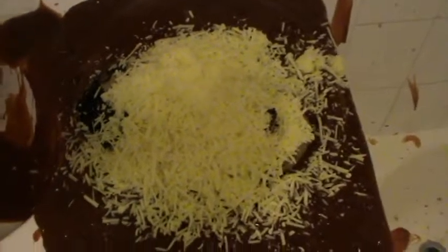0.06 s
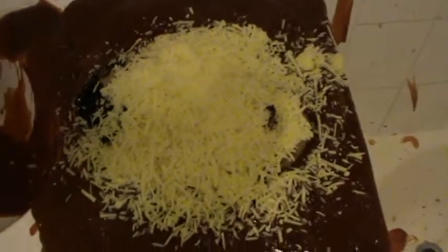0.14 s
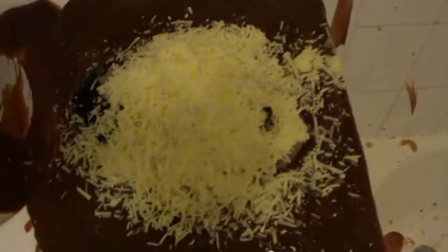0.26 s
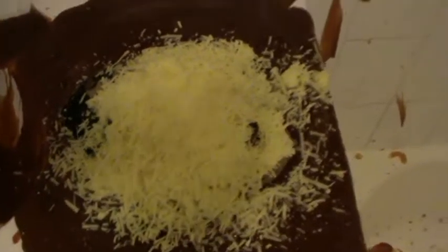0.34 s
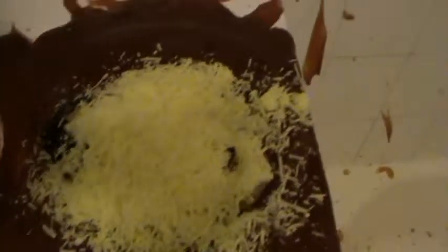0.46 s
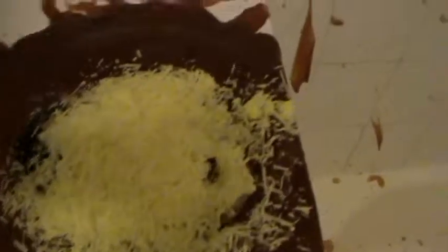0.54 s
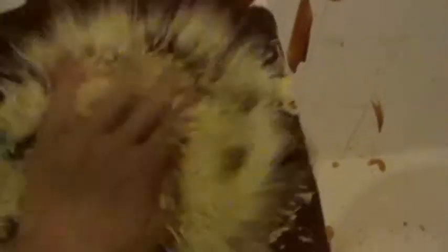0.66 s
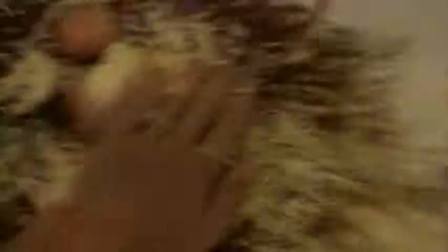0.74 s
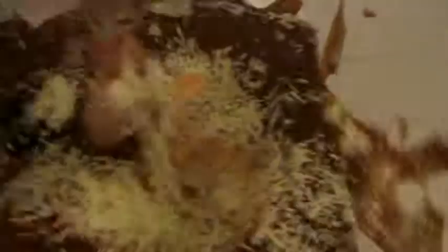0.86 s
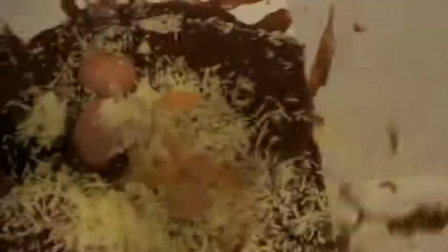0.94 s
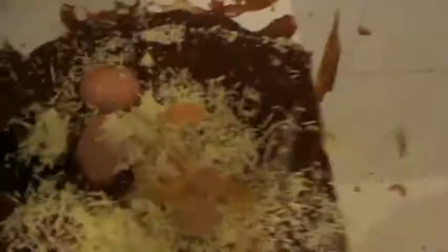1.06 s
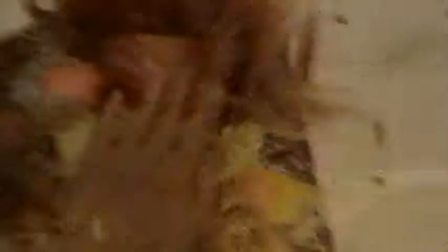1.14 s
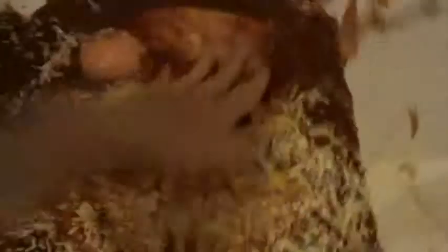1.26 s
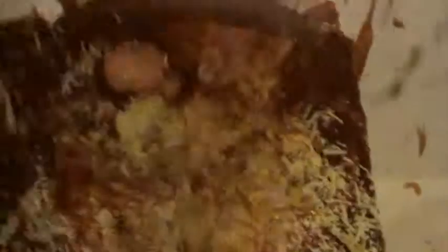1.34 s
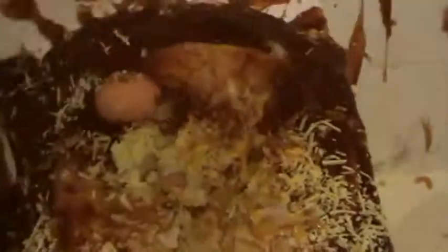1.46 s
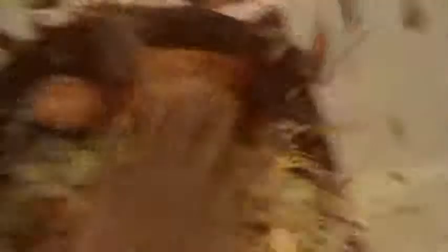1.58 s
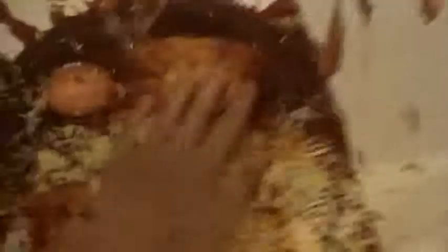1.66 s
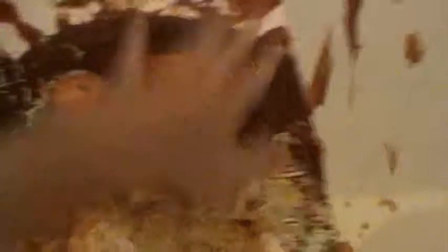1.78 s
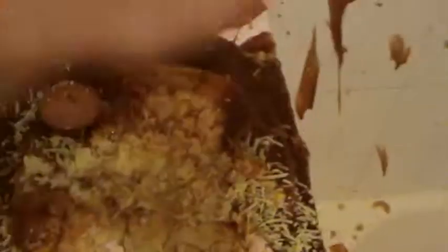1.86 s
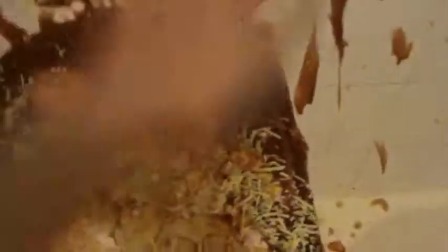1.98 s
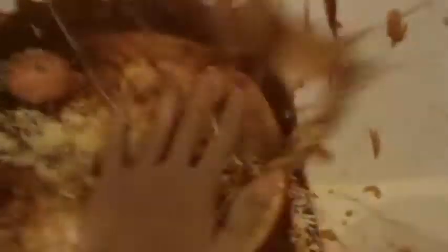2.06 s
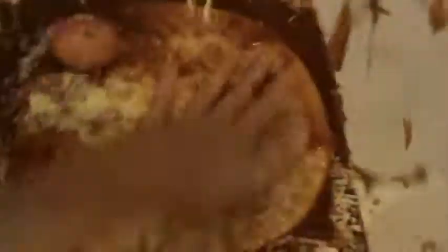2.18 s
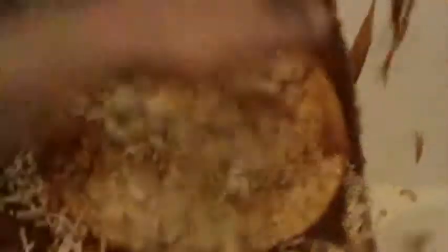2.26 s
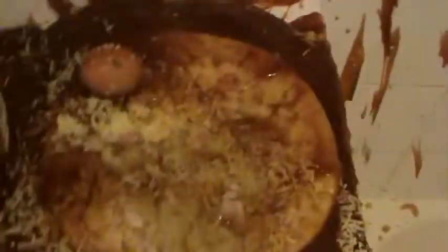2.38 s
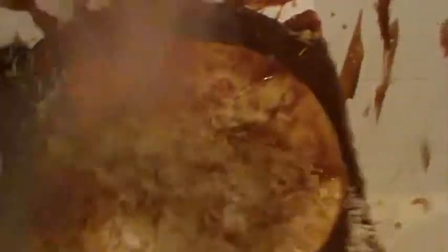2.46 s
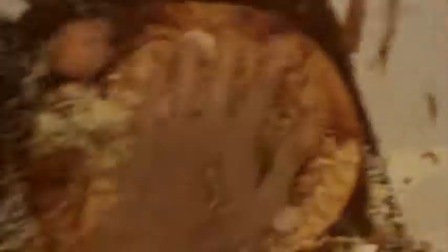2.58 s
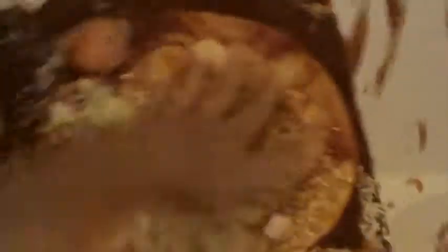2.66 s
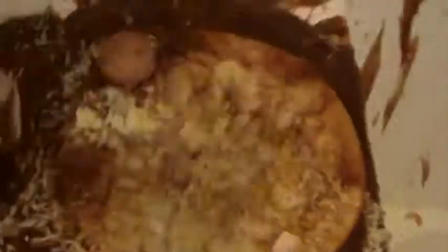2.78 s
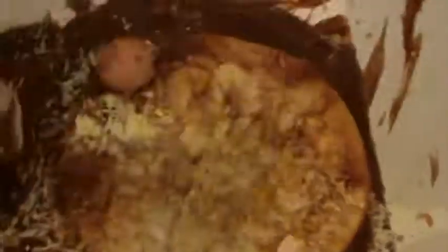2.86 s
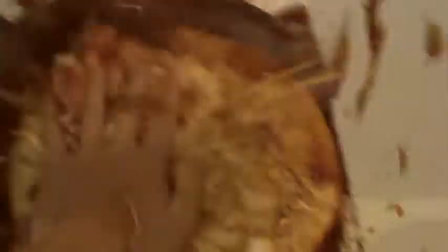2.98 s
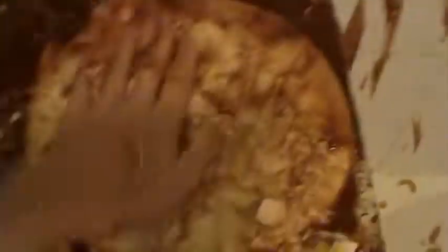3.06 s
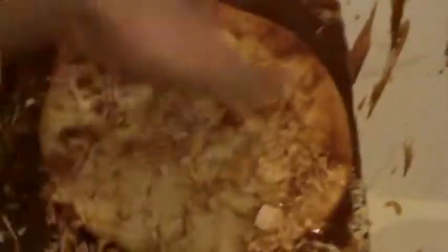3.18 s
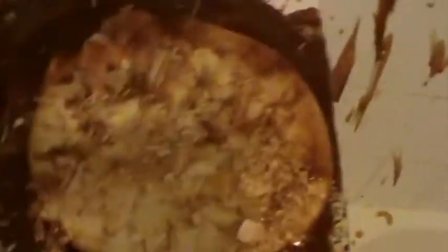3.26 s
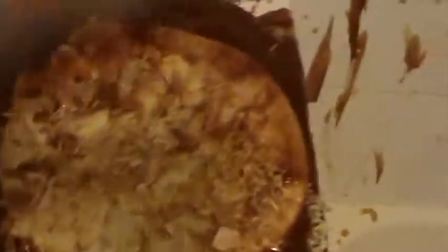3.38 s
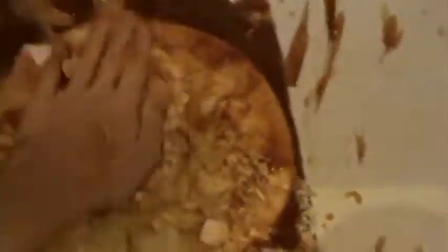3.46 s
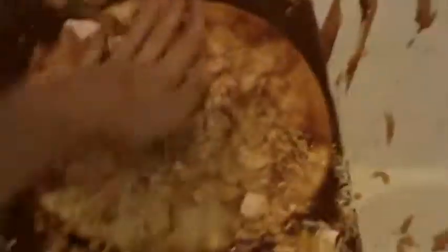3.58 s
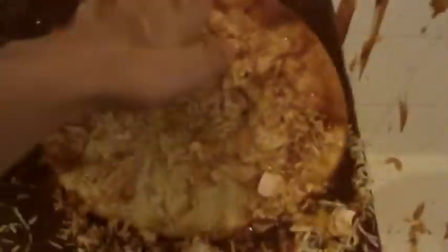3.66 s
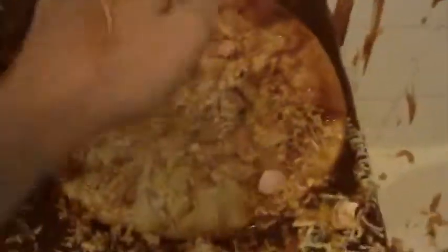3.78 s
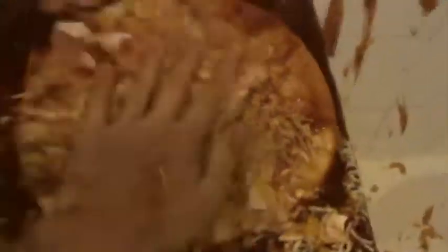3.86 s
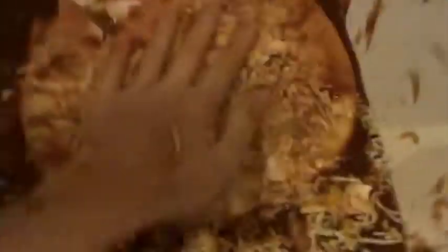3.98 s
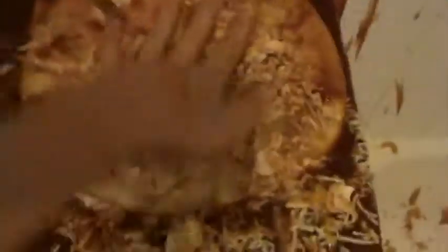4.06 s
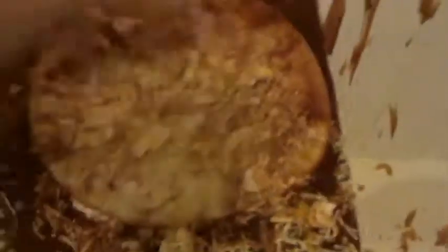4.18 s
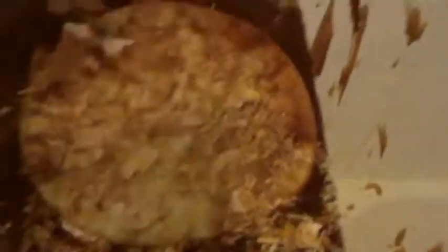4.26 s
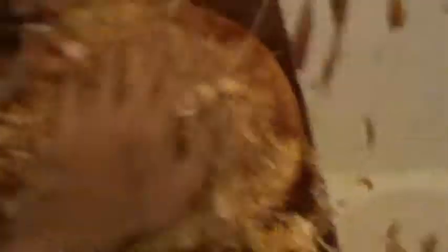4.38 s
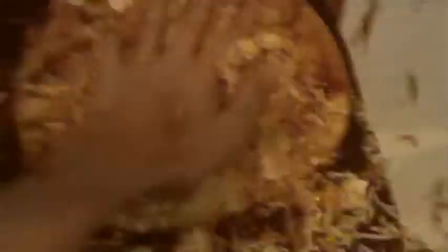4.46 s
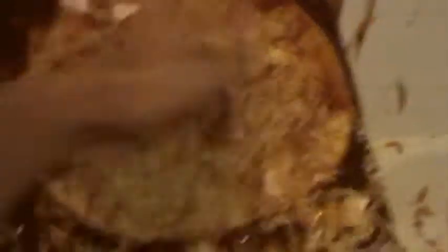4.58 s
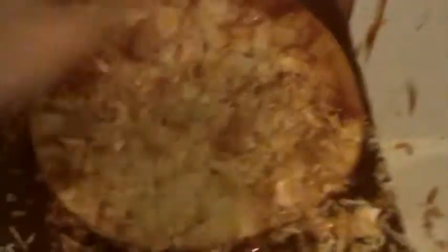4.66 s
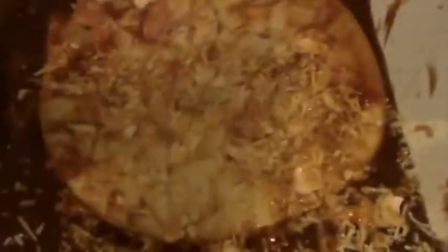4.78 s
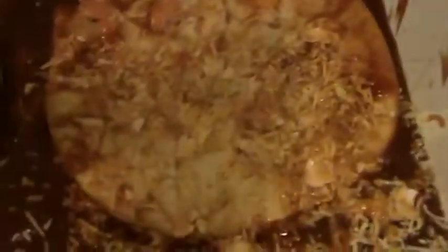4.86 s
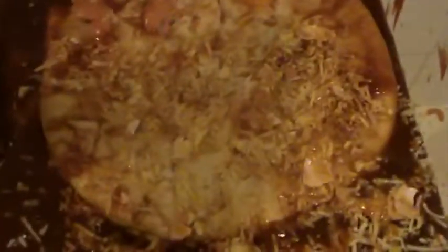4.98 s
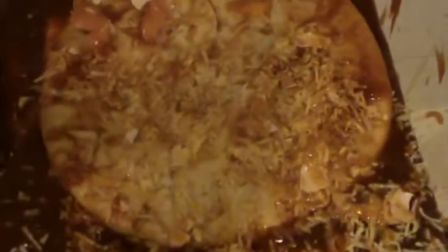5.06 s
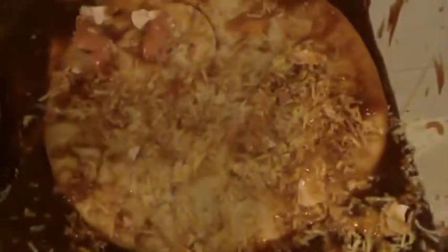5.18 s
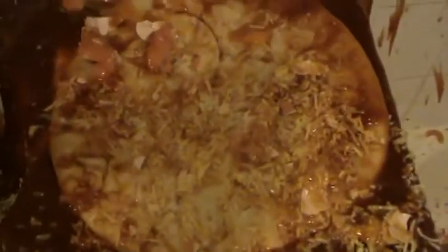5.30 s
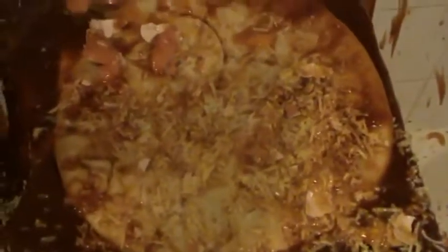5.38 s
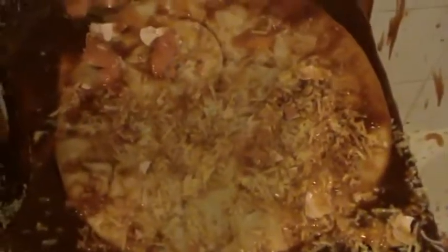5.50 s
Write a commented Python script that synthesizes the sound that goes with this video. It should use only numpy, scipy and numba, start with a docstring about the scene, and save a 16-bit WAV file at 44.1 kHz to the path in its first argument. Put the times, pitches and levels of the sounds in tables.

```python
"""A small tiled bathroom: a flat hand slaps a wet, heaped pizza on a plastic lid nine times.
Each slap cracks, pops and squelches trapped air, knocks the lid and sprays sauce; the palm settles,
may slide, and peels off. Small ticks and plops sound in between. The room booms in its standing
waves, and a gain control flattens the blows."""
import sys
import numpy as np
from scipy import signal
from scipy.fft import rfft, irfft, next_fast_len
from scipy.io import wavfile
from scipy.ndimage import minimum_filter1d
from numba import njit

SR = 44100
rng = np.random.default_rng(int(sys.argv[2]) if len(sys.argv) > 2 else 0)


def digitize_waveform(pressure):
    """Quantize a signal to 16-bit integers and store it at the path in sys.argv[1].

    Rows of a 2-D input are taken as channels; values are limited to [-1, 1].
    """
    field = np.atleast_2d(pressure).T
    bounded = np.clip(field, -1, 1)
    quanta = np.round(bounded * 32767).astype(np.int16)
    wavfile.write(sys.argv[1], SR, quanta)


N = 243873
TIME_S = np.arange(N) / SR
EVENT_S = TIME_S[:SR // 3]
PORT_SIGNS = np.array([[1], [-1]])  # left, right microphone port


def undb(db):
    """Decibels to gain."""
    return 10 ** (np.asarray(db) / 20)


def at(points, hz):
    """Interpolate (Hz, value) points on a log-frequency axis."""
    freqs, values = np.transpose(points)
    return np.interp(np.log(np.maximum(hz, 1)), np.log(freqs), values)


def burst(x, db):
    """Scale x to the energy of 10 ms of sound at db."""
    return x * undb(db) / np.sqrt(np.sum(x ** 2) / (SR / 100))


def add(track, time_s, x):
    """Mix x into the track at time_s."""
    start = max(int(time_s * SR), 0)
    track[start:start + len(x)] += x[:N - start]


def colour(x, points, size=2048):
    """Minimum-phase filter with the given (Hz, dB) spectrum."""
    gain = undb(at(points, np.fft.rfftfreq(size, 1 / SR)))
    cepstrum = irfft(np.log(gain))
    cepstrum[1:size // 2] *= 2
    cepstrum[size // 2 + 1:] = 0
    response = irfft(np.exp(rfft(cepstrum)))
    return signal.fftconvolve(x, response)[:len(x)]


def band(x, hz, octaves, order=1):
    """Band-pass around hz."""
    edges_hz = [hz / 2 ** (octaves / 2), min(hz * 2 ** (octaves / 2), SR / 2 - 1000)]
    return signal.sosfilt(signal.butter(order, edges_hz, "band", fs=SR, output="sos"), x)


def fade(t, t60_s):
    """Exponential decay."""
    return np.exp(-np.log(1000) * t / t60_s)


def ring(hz, t60_s):
    """A struck, damped resonance that pushes no net air."""
    return np.gradient(np.sin(2 * np.pi * hz * EVENT_S) * fade(EVENT_S, t60_s))


def crackle(t, spread_db):
    """Dense tiny clicks of unequal size, as when films of sauce tear."""
    noise = rng.standard_normal(len(t))
    sizes = np.minimum(rng.exponential(size=len(t)), 6)
    return noise * undb(spread_db * sizes)


def bump(hz, t60_s, db):
    """A blow cushioned by dough: only a low note."""
    return burst(band(ring(hz, t60_s), hz, octaves=0.75), db)


def smack(hz, t60_s, db, octaves=1.46):
    """A short tick of band-passed noise."""
    noise = rng.standard_normal(len(EVENT_S)) * fade(EVENT_S, t60_s)
    return burst(band(noise, hz, octaves, order=2), db)


def smear(length_s, hz, octaves, db):
    """Sliding contact: a stream of clicks swells and dies."""
    t = TIME_S[:int(length_s * SR)]
    clicks = crackle(TIME_S[:SR // 2], spread_db=9)[:len(t)]
    swell = np.sin(np.pi * t / length_s)
    return burst(band(clicks * swell, hz, octaves, order=2), db)


# Room noise spectrum: (frequency [Hz], relative density [dB])
FLOOR_SPECTRUM = [(25, 1), (60, -2.5), (140, 7), (300, -3.5), (600, -4), (1500, -11), (4500, -16),
                  (10000, -19), (15500, -24)]


def background(floor_db=-51.5, tick_db=-69.5, tick_period_s=0.08):
    """Low room hum and hiss, with faint regular ticking."""
    mid, left, right = (colour(rng.standard_normal(N), FLOOR_SPECTRUM) for _ in range(3))
    hiss = mid + 1.1 * np.array([left, right])
    ticks = band(rng.standard_normal(N), hz=4800, octaves=0.15, order=2)
    ticks *= fade((TIME_S + 0.023) % tick_period_s, t60_s=0.04)
    return hiss / hiss.std() * undb(floor_db) + ticks / ticks.std() * undb(tick_db)


# Tile echo spectrum: (frequency [Hz], level [dB])
ECHO_SPECTRUM = [(40, -31.5), (120, 4.5), (300, 9), (600, 5.5), (1200, 0.5), (2500, -2), (6000, -5),
                 (15000, -6)]
# Tile echo decay: (frequency [Hz], t60 [s])
ECHO_DECAY = [(100, 0.7), (400, 0.87), (1000, 0.33), (3000, 0.34), (7000, 0.36), (15000, 0.2)]
# Tile echo width: (frequency [Hz], side re mid [dB])
ECHO_WIDTH = [(60, -30), (200, -15), (500, -13), (1500, -4), (4000, -3), (8000, 0), (12000, -6)]


def tile_echo(onset_s=0.002):
    """Two-port response of dense reflections off the tiles, decaying band by band."""
    t = TIME_S[:SR]
    freqs = np.fft.rfftfreq(len(t), 1 / SR)
    mid, side = (rfft(rng.standard_normal(len(t))) for _ in range(2))
    field = mid + PORT_SIGNS * side * undb(at(ECHO_WIDTH, freqs))
    field *= undb(at(ECHO_SPECTRUM, freqs))
    onset = np.minimum(t / onset_s, 1) ** 2
    centres_hz = np.geomspace(120, 16000, 7)
    response = 0
    for hz, weights in zip(centres_hz, np.eye(len(centres_hz))):
        band_noise = irfft(field * at(np.c_[centres_hz, weights], freqs), len(t))
        decay = fade(t, at(ECHO_DECAY, hz)) * onset
        response += band_noise * decay / np.linalg.norm(decay)
    return response


# Room modes: (frequency [Hz], gain [dB], t60 [s])
ROOM_MODES = [(54.14, 15.5, 0.76), (76.8, 13, 0.77), (90.8, 11, 0.45), (133.5, 15.5, 0.46),
              (141.7, 14.5, 1), (185.7, 15.5, 0.55), (192.7, 17, 0.93), (231.7, 14, 1), (236.6, 18.5, 0.43),
              (262, 14.5, 0.97), (302.6, 4.5, 0.8), (304.7, 18, 1), (306, -4, 0.99), (364.5, 15.5, 1),
              (390.6, 22.5, 0.7), (424, 4.5, 0.27), (490, 4.5, 0.85), (498, 10.5, 0.48), (794, 13, 0.54)]


def standing_waves(port_offset_rad=0.18):
    """Response of the room modes; each meets the two ports slightly out of phase."""
    t = TIME_S[:3 * SR // 2]
    response = 0
    for k, (hz, db, t60_s) in enumerate(ROOM_MODES):
        offset_rad = PORT_SIGNS * port_offset_rad * rng.choice([-1, 1])
        wave = (-1) ** k * np.sin(2 * np.pi * hz * t + offset_rad)
        decay = fade(t, t60_s)
        response += undb(db) * wave * 2 * decay / decay.sum()
    return response


def bathroom(directions, direct_db=-4):
    """Direct sound, standing waves, and a separate echo for each direction the sound leaves in."""
    def through(x, response):
        return signal.oaconvolve(x[None], response, axes=1)[:, :N]
    echo = sum(through(x, tile_echo()) for x in directions) / np.sqrt(len(directions))
    boom = through(directions[0], standing_waves())
    return undb(direct_db) * directions[0] + echo + boom


# Port phase: (frequency [Hz], left lead before roll-off [rad])
PORT_LEAD = [(60, 0.8), (260, -0.9), (600, -1.7), (1550, 1.2)]
# Port sensitivity: (frequency [Hz], left minus right [dB])
PORT_TILT = [(60, 3), (120, -1), (380, -1.5), (700, -4), (1300, -1.5), (4400, -1), (8000, -0.5)]


def microphones(x, rolloff_hz=1500):
    """The two ports differ in sensitivity, and long waves meet them out of step."""
    size = next_fast_len(N + SR // 10)
    freqs = np.fft.rfftfreq(size, 1 / SR)
    lead_rad = at(PORT_LEAD, freqs) / (1 + (freqs / rolloff_hz) ** 2)
    gain = undb(PORT_SIGNS * at(PORT_TILT, freqs) / 2)
    response = gain * np.exp(0.5j * PORT_SIGNS * lead_rad)
    return irfft(rfft(x, size) * response, size)[:, :N]


# Small ticks: (time [s], level [dB], centre [Hz])
SMALL_TICKS = [(0.092, -47.5, 6130), (0.628, -54, 2000), (1.111, -28.5, 6130), (1.128, -16.5, 3000),
               (1.142, -26, 4500), (1.164, -13, 6000), (1.429, -8.5, 9000), (2.045, -23.5, 6760),
               (2.530, -21, 3500), (3.140, -8, 2336), (3.44, -30, 5000), (3.747, -20, 1000),
               (4.81, -28, 4100), (5.088, -41, 7940), (5.422, -32, 3780)]


def small_ticks():
    """Drips, a finger touch and faint handling each make a small tick."""
    out = np.zeros(N)
    for time_s, db, hz in SMALL_TICKS:
        add(out, time_s, smack(hz, t60_s=0.019, db=db))
    return out


# Short pitched rings: (time [s], level [dB], pitch [Hz])
SHORT_RINGS = [(0.223, -51, 3269), (0.311, -52.5, 3600), (0.86, -11.5, 2650), (0.994, -29.5, 4000),
               (1.014, -26, 2100), (1.478, -4.5, 458), (2.361, -20, 2500)]


def short_rings(t60_cycles=13):
    """Small wet plops and one light, low knock, each a quickly damped tone."""
    out = np.zeros(N)
    for time_s, db, hz in SHORT_RINGS:
        add(out, time_s, burst(ring(hz, t60_cycles / hz), db))
    return out


def fizz(count=70, span_s=0.28, fall_db=28, spread_db=5, centre_hz=3800, octaves=3.1, t60_cycles=10):
    """Small bubbles keep bursting in the churned sauce after each slap, ever fainter."""
    out = np.zeros(N)
    t = TIME_S[:SR // 30]
    for time_s, *_, spray_db in HAND_SLAPS:
        cloud = np.zeros(N)
        for lateness, pitch, chance in rng.random((count, 3)):
            hz = centre_hz * 2 ** (octaves * (pitch - 0.5))
            size = min(-np.log(1 - chance), 3)
            bubble = np.sin(2 * np.pi * hz * t) * fade(t, t60_cycles / hz)
            add(cloud, lateness * span_s, undb(spread_db * size - fall_db * lateness) * bubble)
        add(out, time_s + 0.04, burst(cloud, spray_db - 8))
    return out


def spatter(count=70, span_s=0.62, fall_db=36, spread_db=4):
    """Drops keep landing after each slap; late ones are fewer and smaller."""
    out = np.zeros(N)
    for time_s, *_, spray_db in HAND_SLAPS:
        turn, chance = rng.random((count, 2)).T
        lateness = turn ** 2
        size = np.minimum(-np.log(1 - chance), 3)
        drops = np.zeros(SR)
        drops[(lateness * span_s * SR).astype(int)] = undb(spread_db * size - fall_db * lateness)
        add(out, time_s + 0.014, burst(band(drops, hz=2800, octaves=3.2), spray_db - 12))
    return out


# Scuff and slides: (time [s], length [s], hiss [dB], rub [dB])
RUBS = [(0.051, 0.17, -62, -46), (0.867, .16, -17, -28.5), (1.056, 0.15, -20.5, -24.5),
        (1.156, .04, -7, -11.5), (1.218, .3, 5.5, 1.5), (1.43, 0.23, -9, -9), (1.708, .05, 8, -8.5),
        (3.619, 0.19, -37.5, -8), (4.852, 0.3, -33, -45)]


def rubs():
    """A faint scuff at the start, then the palm's wet slides and rubs."""
    out = np.zeros(N)
    for time_s, length_s, hiss_db, rub_db in RUBS:
        add(out, time_s, smear(length_s, hz=3710, octaves=2.7, db=hiss_db))
        add(out, time_s, smear(length_s, hz=560, octaves=2, db=rub_db))
    return out


def shove(time_s=1.245):
    """One hard shove rolls the heap over the lid with a rumble."""
    out = np.zeros(N)
    add(out, time_s, smear(length_s=0.17, hz=117, octaves=0.8, db=4))
    return out


# Palm lifts: (time [s], smack [dB], smack centre [Hz], smack t60 [s], suck [dB], lid rebound [dB])
PALM_LIFTS = [(0.98, -22, 3500, .012, -18.5, -28.5), (1.439, -1, 2600, 0.0073, 6, -18),
              (1.859, -16, 6450, .02, -19, -22), (2.362, -9.5, 6700, 0.0064, -28, -23.5),
              (2.821, -23, 7670, 0.083, -29, -39.5), (3.772, -7, 1435, 0.0031, -24, 2),
              (4.261, -18.5, 4730, 0.013, -36.5, -33), (4.661, -24.5, 5500, 0.009, -35.5, -34)]


def lifts(suck_pitch_ratio=1.18):
    """The palm unsticks with a smack and sucks air back into the pocket left by the last slap."""
    out = np.zeros(N)
    for time_s, smack_db, smack_hz, t60_s, suck_db, _ in PALM_LIFTS:
        pocket_hz = [hz for slap_s, _, _, hz, *_ in HAND_SLAPS if slap_s < time_s][-1]
        suck = smear(length_s=0.024, hz=suck_pitch_ratio * pocket_hz, octaves=0.67, db=suck_db)
        add(out, time_s, smack(smack_hz, t60_s, smack_db))
        add(out, time_s, suck)
    return out


def rebounds(lid_hz=207.4, lid_t60_s=0.046):
    """At each lift the lid springs back, the dough flops onto it, and the lid bounces."""
    out = np.zeros(N)
    for time_s, *_, rebound_db in PALM_LIFTS:
        add(out, time_s, bump(lid_hz, lid_t60_s, rebound_db))
        add(out, time_s + 0.012, bump(hz=120, t60_s=0.14, db=rebound_db - 11.5))
        add(out, time_s + 0.062, bump(lid_hz, lid_t60_s / 2, rebound_db - 13.5))
    return out


def settling(delay_s=0.105):
    """The arm's weight settles on the dough after each slap."""
    out = np.zeros(N)
    for time_s, *_, thud_db, _ in HAND_SLAPS:
        add(out, time_s + delay_s, bump(hz=136, t60_s=0.021, db=thud_db - 16))
    return out


def chatter(delay_s=0.008096):
    """The loose lid rattles on its seat after each knock, roughening the boom."""
    out = np.zeros(N)
    for time_s, *_, knock_db, _, _ in HAND_SLAPS:
        clicks = crackle(EVENT_S, spread_db=4) * fade(EVENT_S, t60_s=0.065)
        rattle = band(clicks, hz=320, octaves=1.46, order=2)
        add(out, time_s + delay_s, burst(rattle, knock_db - 7))
    return out


# Fingertip landings: (time [s], level [dB], centre [Hz])
FINGER_TAPS = [(1.621, -1, 5630), (2.5528, -3, 1290), (3.016, -0.5, 1000)]


def fingertips():
    """A tilted hand lands fingertips first, with a broad tick."""
    out = np.zeros(N)
    for time_s, db, hz in FINGER_TAPS:
        add(out, time_s, smack(hz, t60_s=0.021, db=db, octaves=2.33))
    return out


# Wet contact spectrum: (frequency [Hz], relative level [dB])
WET_SPECTRUM = [(60, 6), (400, 2.5), (1500, -2.5), (3000, 1), (5000, 2), (8000, -1.5), (12000, -2),
                (15500, -25)]
# Modes of the lid over its hollow: (frequency [Hz], relative level [dB], t60 [s])
LID_MODES = [(306.3, 7.5, 0.042), (233.5, -3, 0.15), (261.5, -6.5, 0.25), (289.5, -10, 0.12),
             (368.8, -15.5, 0.28), (495.2, -6, 0.26)]
# Slaps: (time [s], contact [s], crack [dB], air pocket [Hz], pop [dB], squelch [dB],
#         lid knock [dB], thud [dB], spray [dB])
HAND_SLAPS = [(0.711, 0.036, -5.5, 1370, -13.5, -1.5, -33, -12.5, -1),
              (1.187, 0.012, 7, 1434, 13.5, 4, -17.5, 5.5, 12.5),
              (1.623, 0.0078, 15, 970, 11, 0, 13, 5.5, 11.5),
              (2.099, 0.0065, 6.5, 2440, 6, 0.5, 5.5, -4, 6),
              (2.560, 0.0068, 12.5, 1172, 7.5, 2.5, 9, 4, -0.5), (3.022, 0.0091, 13, 684, 8, 2, 3, -4, 1.5),
              (3.490, 0.0059, 2.5, 1736, 3, 2, -0.5, 0.5, 6),
              (3.923, 0.0039, 10.5, 1700, 7.5, -4.5, 7, -0.5, -2.5),
              (4.422, 0.0042, 9.5, 1300, 3.5, 2.5, 6.5, 1, -2)]


def slaps():
    """Skin cracks on sauce, trapped air pops and squelches out, the lid knocks, and sauce sprays."""
    out = np.zeros(N)
    lid = sum(undb(db) * ring(hz, t60_s) / hz for hz, db, t60_s in LID_MODES)
    for (time_s, contact_s, crack_db, pocket_hz, pop_db, squelch_db,
         knock_db, thud_db, spray_db) in HAND_SLAPS:
        contact = np.exp(-(EVENT_S / contact_s) ** 2)  # a thick heap lengthens the landing
        crack = crackle(EVENT_S, spread_db=2.5) * contact
        add(out, time_s, burst(colour(crack, WET_SPECTRUM), crack_db))
        add(out, time_s + 0.00145, burst(ring(pocket_hz, t60_s=7 / pocket_hz), pop_db))
        add(out, time_s + 0.00332, burst(lid, knock_db))
        add(out, time_s + 0.005012, burst(ring(hz=83, t60_s=0.0084), thud_db))
        add(out, time_s + 0.0054, smear(length_s=0.057, hz=pocket_hz, octaves=1.42, db=squelch_db))
        spray_s = 0.016 + 1.5 * contact_s  # a longer landing sprays for longer
        spray = crackle(EVENT_S, spread_db=3) * EVENT_S * np.exp(-2 * EVENT_S / spray_s)
        add(out, time_s, burst(colour(spray, WET_SPECTRUM), spray_db))
    return out


def scene(direction_count=4):
    """Sauce tears at many spots at once, so each direction gets its own fine crackle."""
    shared = settling() + rebounds() + spatter() + fizz() + short_rings()
    directions = [
        shared + slaps() + chatter() + lifts() + fingertips() + small_ticks() + rubs() + shove()
        for _ in range(direction_count)]
    return microphones(bathroom(directions)) + background()


@njit
def follow(peaks, attack_s, release_s):
    """Attack-release envelope follower."""
    out, level = np.empty(len(peaks)), 0.
    for i in range(len(peaks)):
        lag_s = attack_s if peaks[i] > level else release_s
        level += (peaks[i] - level) / (SR * lag_s)
        out[i] = level
    return out


def turn_down(x, top_db, max_cut_db, attack_s, release_s, ahead_samples=45):
    """Look-ahead gain reduction holds peaks near top_db, cutting by at most max_cut_db."""
    peaks = -minimum_filter1d(-np.abs(x).max(axis=0), ahead_samples)
    peaks = np.minimum(peaks, undb(top_db + max_cut_db))
    reduction = np.maximum(follow(peaks, attack_s, release_s) / undb(top_db), 1)
    return x / np.pad(reduction[ahead_samples:], (0, ahead_samples), "edge")


def record(dry, cutoff_hz=16000):
    """Slow gain control, quick limiter, rounded peaks, steep top cut."""
    levelled = turn_down(dry, top_db=-9, max_cut_db=12, attack_s=0.003, release_s=3.0)
    limited = turn_down(levelled, top_db=-1.5, max_cut_db=30, attack_s=0.00085, release_s=0.04)
    lowpass = signal.ellip(8, 0.2, 70, cutoff_hz, fs=SR, output="sos")
    return signal.sosfilt(lowpass, np.tanh(limited))


dry = scene()
out = record(dry)
digitize_waveform(out)
```